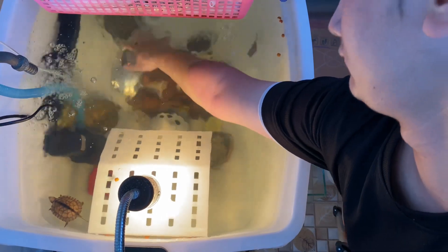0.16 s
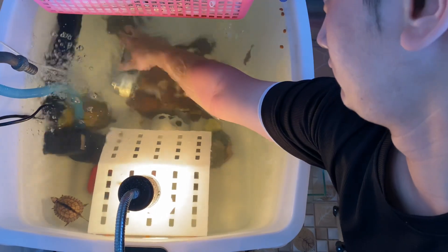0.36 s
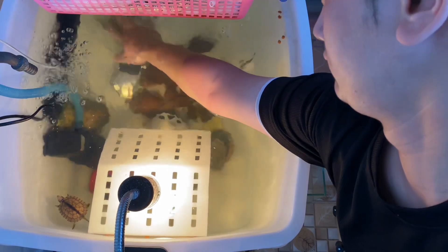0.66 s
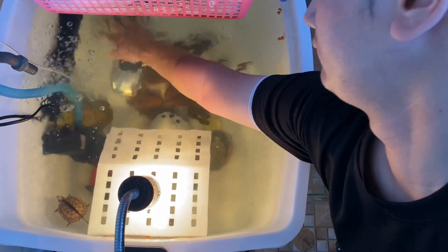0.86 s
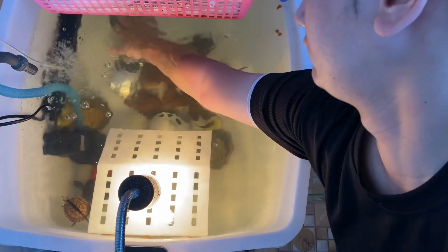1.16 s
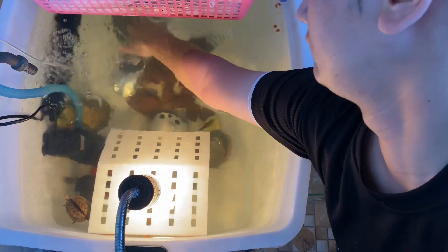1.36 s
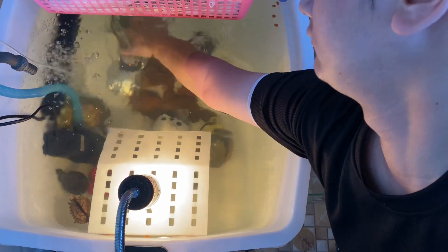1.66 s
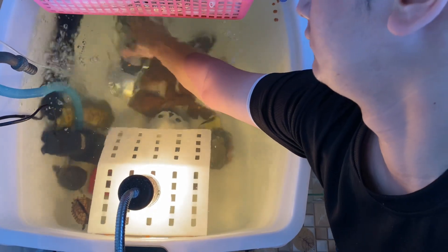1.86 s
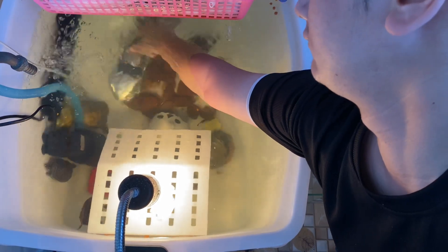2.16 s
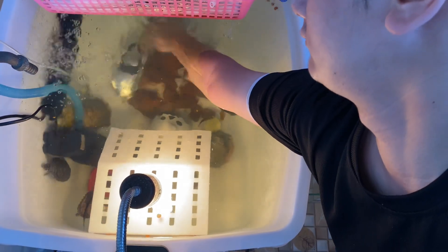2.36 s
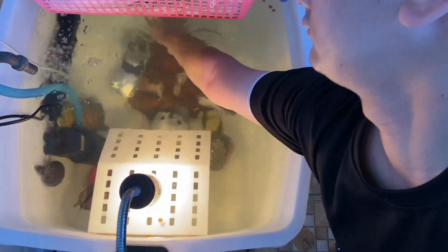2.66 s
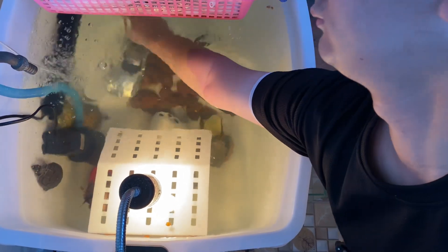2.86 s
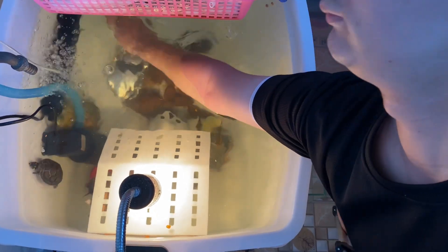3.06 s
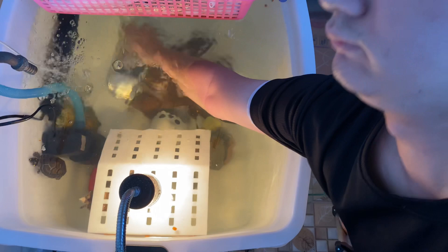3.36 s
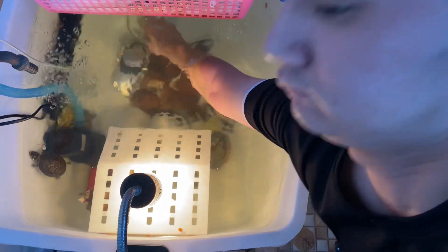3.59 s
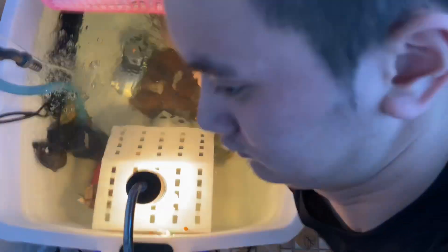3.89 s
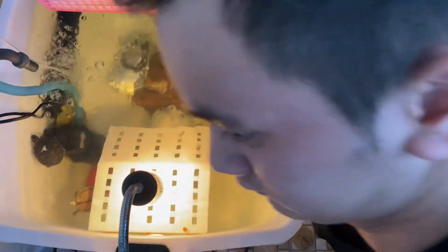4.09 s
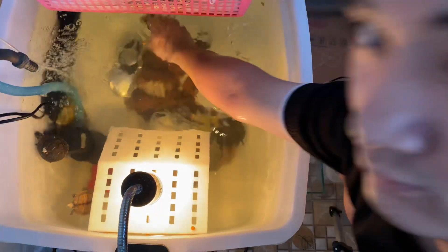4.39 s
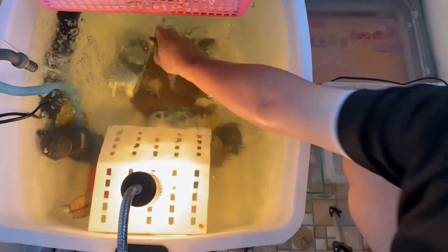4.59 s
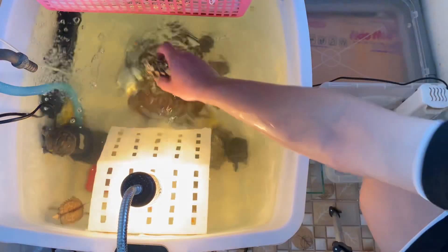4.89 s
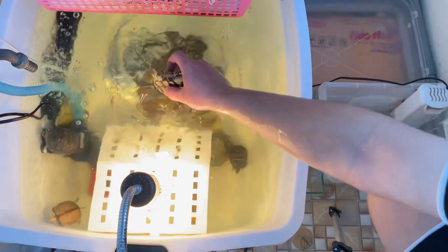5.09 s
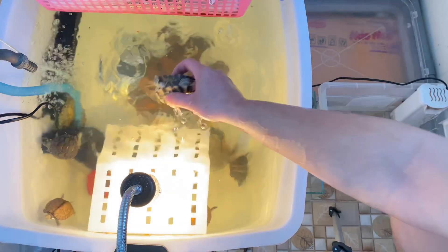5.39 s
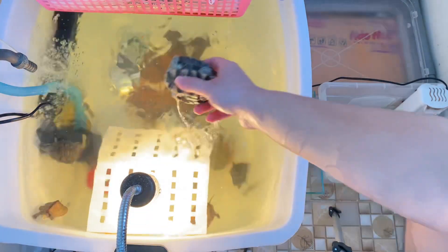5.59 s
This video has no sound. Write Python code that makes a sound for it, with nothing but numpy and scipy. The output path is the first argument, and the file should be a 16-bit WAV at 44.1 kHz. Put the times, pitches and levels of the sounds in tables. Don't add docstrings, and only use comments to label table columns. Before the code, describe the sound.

A small electric pump hums steadily at a low pitch in a plastic tub indoors. Its outlet bubbles and fizzes as a hand stirs the water, with bright drops plinking irregularly. Around 3.7 seconds a stone knocks and bounces quickly on the wall, then taps once more. Splashing continues, and faint low gusts rumble near the end. Close stereo microphone, small room.

```python
import sys
import numpy as np
from scipy import signal
from scipy.fft import rfft, irfft
from scipy.io import wavfile
from scipy.ndimage import uniform_filter1d

SR = 44100
rng = np.random.default_rng(int(sys.argv[2]) if len(sys.argv) > 2 else 0)


def invert_db(x):
    u = np.asarray(x, float) / 20
    return 10 ** u


def pcm_store(signal):
    levels = np.round(np.clip(np.atleast_2d(signal), -1, 1) * 32767)
    wavfile.write(sys.argv[1], SR, levels.astype(np.int16).T)


N = 253134
HZ = np.fft.rfftfreq(N, 1 / SR) + 1e-3
STEP = 40

# time in seconds, level in dB.
HUM_LEVEL = [(0.0, -25), (0.03, -28.5), (0.97, -28), (1.02, -29.5), (3.01, -29), (3.04, -30.5),
             (3.66, -29.5), (3.69, -31.5), (3.82, -25), (3.87, -30), (4.14, -27.5), (4.91, -29),
             (5.39, -27.5), (5.53, -33), (5.71, -28.5), (5.74, -33)]
# frequency in Hz, width in Hz, lift in dB.
TUB_MODES = [(182.5, 14.6, 15), (234.5, 5.6, 6), (364.3, 29.3, 9.5), (466, 16, 4), (543.5, 19, 8),
             (611.6, 27, 9), (767, 32, 6.5), (840, 17, 5.5), (944, 19, 5), (1143, 32, 8.5), (1230, 17, 2.5),
             (1458, 23, 7), (1475, 78, -4.5), (2520, 52, 8)]
# frequency in Hz, density in dB per Hz.
WASH_SPECTRUM = [(22, -70), (35, -90), (50, -57), (75, -58), (130, -71.5), (300, -71), (900, -75.5),
                 (1500, -80), (2000, -84.5), (3200, -87.5), (4600, -92.5), (5100, -90.5), (10000, -96),
                 (16500, -99.5)]
WATER_TOPS_HZ = [130, 550, 1500, 4700]
STIR_SHARES = [0.3, 0.38, 1.9, 1.34]
# time in seconds, splash level in dB.
STIRRING = [(0.0, -49), (0.83, -49.5), (3.15, -48), (3.53, -47), (3.82, -47.5), (4.41, -48), (4.83, -46.5),
            (5.51, -48.5), (5.74, -47.5)]
# start in seconds, peak in dB, pitch in Hz.
DROPS = [(0.1, -32.5, 3260), (0.2985, -30.5, 3120), (.308, -42, 3340), (0.371, -29.5, 2800),
         (0.5067, -23, 3670), (0.6973, -45, 1790), (1.029, -40, 3080), (1.2694, -43, 4100),
         (1.4745, -35.5, 1635), (1.6651, -34, 3320), (1.8208, -37, 1500), (2.047, -38, 3290),
         (2.6419, -27.5, 5200), (2.7955, -31, 3090), (2.9294, -31.5, 5180), (2.9956, -41, 4000),
         (3.0195, -40, 2500), (3.041, -36, 2550), (3.1507, -26.5, 2990), (3.2774, -38, 3780),
         (3.338, -40, 3820), (3.9594, -40, 2230), (4.2308, -38, 3600), (4.8703, -34, 3020),
         (4.9544, -36, 4070), (5.1494, -40, 3580), (5.4864, -38, 2520), (5.5942, -34, 2570),
         (.11, -37, 2540), (0.821, -43, 2490), (1.501, -32, 3760), (1.66, -32, 2550),
              (2.38, -43.5, 3820), (2.566, -37, 3230), (2.644, -30, 3340), (4.0, -36, 3640),
              (4.299, -40, 6160), (4.375, -40, 3600), (5.195, -37.5, 3140), (5.255, -50, 3420),
              (5.389, -36, 4240)]
# start in seconds, peak in dB, pitch in Hz.
GLUGS = [
    (1.174, -38.5, 1250),
    (1.511, -41, 797),
    (2.33, -39.5, 860),
    (3.604, -36.5, 1247),
    (3.609, -33, 1600),
    (3.63, -42, 1390),
    (5.072, -36.5, 1014),
    (5.657, -42.5, 1270),
]
# start in seconds, peak in dB.
SPRAY_TICKS = [(0.027, -38), (0.088, -33), (0.16, -36.5), (0.5327, -36.5), (.94, -41), (1.6631, -42),
               (2.5545, -41.5), (2.9308, -40), (3.0354, -39.5), (3.2595, -44), (3.6695, -48), (3.691, -37),
               (3.86, -40), (4.197, -43), (4.301, -41), (4.41, -46), (4.8274, -35), (5.0823, -33),
               (5.176, -39), (5.189, -39), (5.3394, -32.5), (5.365, -34.5), (5.31, -36)]
# start in seconds, peak in dB.
PLASTIC_SNAPS = [(0.2616, -32.5), (0.504, -38), (1.7984, -38), (2.418, -39), (2.639, -31), (2.843, -42),
                 (3.4846, -34.5), (4.9343, -30), (5.2996, -32), (5.5115, -30)]
# start in seconds, peak in dB, centre in Hz, rattle in seconds.
STONE_KNOCKS = [
    (3.6985, -10.5, 1060, 0.025),
    (3.707, -12, 756, 0.028),
    (3.724, -25.5, 1670, 0.023),
    (3.720, -11.5, 840, 0.03),
    (3.735, -20, 860, 0.075),
    (3.745, -34, 1920, 0.095),
    (3.767, -21, 555, 0.019),
    (3.795, -26.5, 826, 0.024),
    (3.8715, -21.5, 820, 0.0047),
    (3.875, -19.5, 328, 0.0045),
]
# start in seconds, peak in dB, centre in Hz, rattle in seconds.
TUB_BOOMS = [
    (3.709, -28.5, 207, 0.42),
    (3.874, -24, 107, 0.061),
]
# start in seconds, peak in dB, centre in Hz, length in seconds.
SPLASHES = [(0.304, -45, 3050, 0.07), (0.508, -26, 4400, .01), (.80, -32, 1580, 0.063),
            (1.49, -32, 3030, 0.18), (2.95, -49, 5400, 0.038), (3.024, -35, 2600, .11),
            (3.484, -19, 2640, 0.011), (3.698, -31.5, 3260, 0.11), (3.914, -37, 2400, .12),
            (4.935, -25, 5460, 0.023), (5.489, -30, 2500, 0.033), (5.594, -31, 2680, .03)]
# frequency in Hz, level in dB, 60 dB decay time in seconds.
WALL_MODES = [(330, -8, .07), (468, -4, .09), (624, 0, .12), (834, -1, .09), (921, -5, .1),
              (1222, -14, .06), (1480, -10, .06), (1750, -14, .05)]
# time of the top in seconds, level in dB, hold in seconds.
GUSTS = [
    (5.405, -35, 0.044),
    (5.485, -37, 0.036),
    (5.56, -34.5, 0.029),
    (5.635, -44.5, 0.11),
]
# frequency in Hz, likeness from 0 to 1.
PORT_LIKENESS = [(60, .99), (250, .97), (640, .8), (1400, .4), (2500, .35), (3800, .6), (4600, .25),
                 (5200, .75), (7000, .78), (16000, .76)]
# frequency in Hz, lead of the left in radians.
PORT_LEAD = [(0, 0), (700, -.5), (1100, -.8), (1900, 0), (2600, 1.7), (3800, .7), (5000, .3), (7250, 3.14),
             (10600, 6.28), (13550, 9.42), (16600, 12.5)]
# frequency in Hz, left over right in dB.
PORT_BALANCE = [(60, 2), (110, -2.4), (200, -0.12), (380, 0.0), (700, -1.7), (1290, 0.63), (2380, -2),
                (4400, -1.5), (8120, 1), (15000, -1)]
# frequency in Hz, dB under the other at which one is dropped.
MASKED_BELOW = [(100, -28), (400, -16), (1000, -20), (4500, -12), (6500, -5), (7700, -3.5), (11000, -3.8),
                (13000, -2.5), (14500, -.5), (16000, -1.5)]


def rms_one(x):
    return x / np.sqrt(np.mean(x ** 2) + 1e-20)


def at_hz(points, hz):
    table = np.array(points)
    return np.interp(np.log(hz), np.log(table[:, 0]), table[:, 1])


def in_time(rows):
    s, level = np.transpose(rows)
    return np.interp(np.arange(N // STEP + 1) * STEP / SR, s, level)


def fine(coarse):
    return np.interp(np.arange(N) / STEP, np.arange(len(coarse)), coarse)


def drift(rate_hz):
    r = np.exp(-2 * np.pi * rate_hz * STEP / SR)
    white = rng.standard_normal(N // STEP + 2001)
    slow = signal.lfilter([1], [1, -2 * r, r * r], white)[2000:]
    return rms_one(slow - slow.mean())


def swell(start, hold, rise_db, fall_db):
    t = np.arange(N // STEP + 1) * STEP / SR
    return -rise_db * np.maximum(start - t, 0) - fall_db * np.maximum(t - start - hold, 0)


def band_pass(x, low_hz, high_hz, order=2):
    return signal.sosfilt(signal.butter(order, [low_hz, high_hz], "band", fs=SR, output="sos"), x)


def high_pass(x, low_hz):
    return signal.sosfilt(signal.butter(2, low_hz, "high", fs=SR, output="sos"), x)


def dying(clicks, life_s):
    return signal.lfilter([1], [1, -np.exp(-1 / (life_s * SR))], clicks + 1e-18)


def ring(force, hz, t60):
    r, w = invert_db(-60 / (t60 * SR)), 2 * np.pi * hz / SR
    return signal.lfilter([0, np.sin(w)], [1, -2 * r * np.cos(w), r * r], force + 1e-18)


def room(x):
    t60_s, first_echo_s = 0.26, 0.008
    t = np.arange(int(0.4 * SR)) / SR
    tail = rng.standard_normal((2, len(t))) * invert_db(-60 * t / t60_s) * (t > first_echo_s)
    tail = signal.lfilter([1], [1, -0.3], tail)
    return signal.fftconvolve(x[None], tail / np.sqrt(np.sum(tail[0] ** 2)), axes=1)[:, :N]


def ports(pair):
    first, second = rfft(pair)
    alike = np.clip(at_hz(PORT_LIKENESS, HZ), 0, 1)
    lead = np.interp(HZ, *np.transpose(PORT_LEAD))
    right = alike * first * np.exp(-1j * lead) + 1j * np.sqrt(1 - alike ** 2) * second
    tilt = invert_db(at_hz(PORT_BALANCE, HZ) / 2)
    return irfft(np.array([first * tilt, right / tilt]), N)


def draught():
    rise_db_per_s, fall_db_per_s = 452, 300
    deep = band_pass(rng.standard_normal(N), 60, 140)
    flap = band_pass(rng.standard_normal(N), 200, 600)
    air = rms_one(deep) + 0.5 * rms_one(flap) * fine(invert_db(1.7 * drift(40.0)))
    gusts = sum(invert_db(level_db + swell(s, hold, rise_db_per_s, fall_db_per_s)) for s, level_db, hold in GUSTS)
    return air * fine(gusts) * np.array([[1], [-1]])


def churn(patchy_db):
    stir_db = in_time(STIRRING)
    curves = [0] + [share * (stir_db - stir_db.mean()) for share in STIR_SHARES]
    cut_db = -17 - swell(5.41, 0.11, 503, 503)
    curves[1] = curves[1] + np.minimum(cut_db, 0)
    edges = 22 * 2 ** np.arange(0, 9.7, 1 / 3)
    white = rng.standard_normal((2, 2, N))
    together = drift(40.0)
    out = 0
    for k, (lo, hi) in enumerate(zip(edges, edges[1:])):
        hz = np.sqrt(lo * hi)
        patchy = patchy_db * (min(hz, 7000) / 3000) ** 0.5
        flicker = patchy * (0.33 * together + drift(11.6))
        stirred = curves[np.searchsorted(WATER_TOPS_HZ, hz)]
        gain = invert_db(at_hz(WASH_SPECTRUM, hz) + stirred + flicker)
        out = out + fine(gain) * band_pass(white[k % 2], lo, hi)
    return out * np.sqrt(SR / 2)


def water():
    lift = 0
    for hz, wide, peak_db in TUB_MODES:
        lift = lift + (invert_db(peak_db) - 1) / (1 + (2 * (HZ - hz) / wide) ** 2)
    return irfft(rfft(churn(patchy_db=2.57)) * (1 + lift), N)


def bubbles(count, low_hz, high_hz, over_db):
    when, pitch, size = rng.random((count, 3)).T
    hz = low_hz * (high_hz / low_hz) ** pitch
    peak_db = at_hz(WASH_SPECTRUM, hz) + 10 * np.log10(hz) + over_db - 3.2 * np.log(size + 0.041)
    return np.transpose([0.02 + when * (N / SR - 0.02), peak_db, hz])


def satellites(table):
    parents = np.repeat(table, 3, axis=0)
    late, weak, off = rng.random((len(parents), 3)).T
    start = parents[:, 0] + 0.055 * late
    peak_db = parents[:, 1] - 8 - 9 * weak
    return np.transpose([start, peak_db, parents[:, 2] * (0.92 + 0.35 * off)])


def drops(table, cycles, glide, rough):
    out, t = np.zeros(N + SR), np.arange(int(0.05 * SR)) / SR
    variety = rng.uniform(1.0, 1.31, (len(table), 2))
    for (s, peak_db, hz), (long, bend) in zip(table, variety):
        life = t * hz / (cycles * long)
        shape = (1 - np.exp(-t / 0.00034)) * np.exp(-life)
        slide = 1 + glide * bend * (1 - np.exp(-life))
        tone = np.sin(2 * np.pi * hz * np.cumsum(slide) / SR)
        at = round(s * SR) - 20
        out[at:at + len(t)] += invert_db(peak_db + 1.54) * shape * tone
    return out[:N] * (1 + rough * fine(drift(100.0)))


def ticks():
    life_s, middle_db = 0.007, -14
    treble, middle = np.zeros((2, N))
    for s, peak_db in SPRAY_TICKS:
        treble[round(s * SR)] = invert_db(peak_db - 2.5)
        middle[round(s * SR)] = invert_db(peak_db + middle_db - 6)
    noise = rng.standard_normal((2, N))
    bright = high_pass(noise[0] * dying(treble, life_s), 6500)
    return bright + band_pass(noise[1] * dying(middle, life_s), 3500, 6500)


def snaps():
    clicks = np.zeros(N)
    for s, peak_db in PLASTIC_SNAPS:
        clicks[round(s * SR)] = invert_db(peak_db)
    return high_pass(rng.standard_normal(N) * dying(clicks, 0.0017), 1810)


def contacts():
    spread = 1.675
    force, t = np.zeros(N), np.arange(int(0.13 * SR)) / SR
    for s, peak_db, hz, rattle in STONE_KNOCKS + TUB_BOOMS + SPLASHES:
        burst = rng.standard_normal(len(t)) * np.exp(-3 * t / rattle) * np.minimum(t / 0.0014, 1)
        burst = band_pass(burst, hz / spread, hz * spread, order=3)
        at = round(s * SR)
        force[at:at + len(t)] += invert_db(peak_db) * burst / np.abs(burst).max()
    wall = sum(invert_db(level_db - 42.0) * ring(force, hz, t60) for hz, level_db, t60 in WALL_MODES)
    return 0.89 * force + wall


def pump():
    hum_hz, mains_db = 99.8, -46.5
    turn = 2 * np.pi * np.cumsum(hum_hz + 0.04 * fine(drift(0.84))) / SR
    hum = fine(invert_db(in_time(HUM_LEVEL) + 0.9 * drift(10.3))) * np.sin(turn)
    mains = fine(invert_db(mains_db + 1.4 * drift(4.0))) * np.sin(turn / 2)
    return np.sqrt(2) * (hum + mains)


def scene():
    falling = DROPS
    plinks = drops(falling, 12, -0.041, rough=1.0)
    plinks = plinks + drops(satellites(falling), 5.4, 0.028, rough=0.33)
    plinks = plinks + drops(GLUGS, 15.5, 0.095, rough=0.72)
    babble = drops(bubbles(count=220, low_hz=1100, high_hz=3600, over_db=-6), 14.0, 0.05, rough=0.6)
    fizz = drops(bubbles(count=1600, low_hz=1700, high_hz=15000, over_db=-8), 28.0, 0.03, rough=0.4)
    small = babble + fizz
    knock, spray = contacts(), ticks() + snaps()
    into_room = invert_db(-7) * plinks + invert_db(-2.0) * small + invert_db(-7.5) * knock + invert_db(-2.0) * spray
    near = plinks + small + spray + knock + room(into_room)
    return ports(water() + near) + pump() + draught()


def sharp_attacks():
    half_s, full_db = 0.007, -26
    t = np.arange(N) / SR
    shares = []
    for s, peak_db in PLASTIC_SNAPS:
        window = np.clip(2 - 2 * np.abs(t - s) / half_s, 0, 1)
        shares.append(window * min(invert_db(peak_db - full_db), 1))
    return np.max(shares, axis=0)


def joint_stereo(x):
    lag = 712
    pair = np.pad([x[0] + x[1], x[0] - x[1]], ((0, 0), (lag, 0)))
    hz, _, z = signal.stft(pair, SR, "cosine", 2048, 1024)
    edges = np.r_[0:40:8, 40:96:14, 96:1025:16]
    band = np.searchsorted(edges, np.arange(len(hz)), "right") - 1
    power = np.add.reduceat(np.abs(z) ** 2, edges, axis=1) + 1e-20
    power = uniform_filter1d(power, size=3, axis=1)
    limit = invert_db(2 * at_hz(MASKED_BELOW, hz[edges] + 90))[:, None]
    per_line = power / np.diff(np.r_[edges, len(hz)])[:, None]
    faint = invert_db(-17.5) * per_line[:, band] * (hz > 1200)[:, None]
    z = z * (np.abs(z) ** 2 > faint)
    kept = (power > limit * power[::-1])[:, band]
    both = signal.istft(z * kept, SR, "cosine", 2048, 1024)[1][:, lag:lag + N]
    return np.array([both[0] + both[1], both[0] - both[1]]) / 2


def band_limit(x):
    return signal.sosfilt(signal.butter(12, 17140, fs=SR, output="sos"), x)


def record(dry):
    cut = irfft(rfft(dry) * (HZ < 15900), N)
    sharp = sharp_attacks()
    mix = sharp * cut + (1 - sharp) * joint_stereo(cut)
    return band_limit(mix)


dry = scene()
out = record(dry)
pcm_store(out)
```